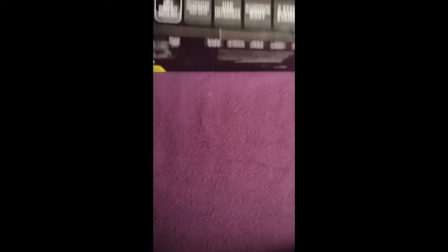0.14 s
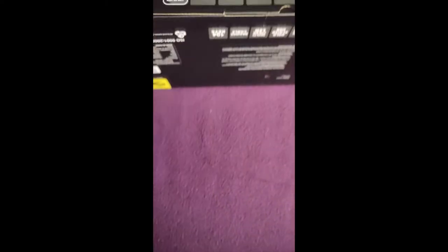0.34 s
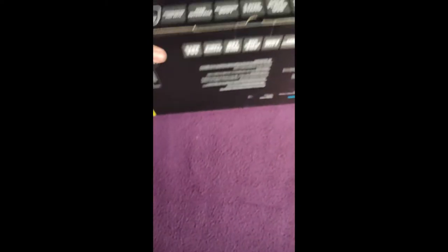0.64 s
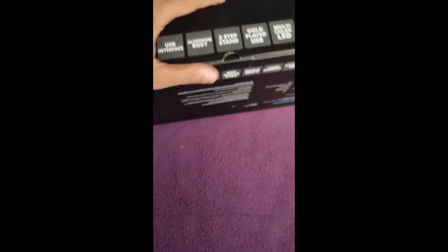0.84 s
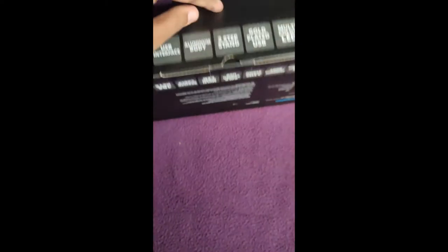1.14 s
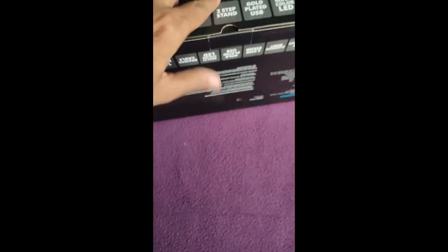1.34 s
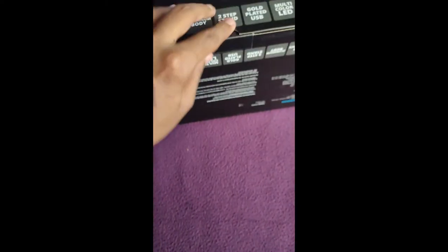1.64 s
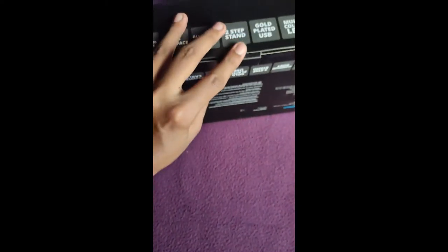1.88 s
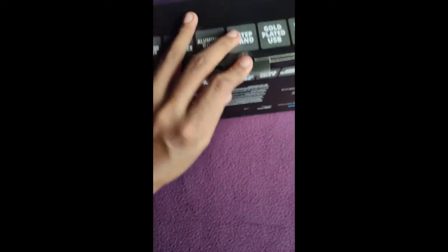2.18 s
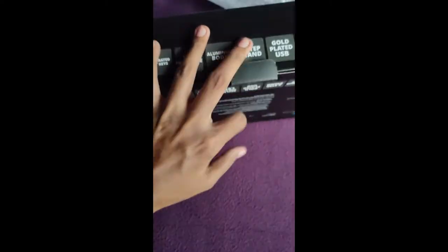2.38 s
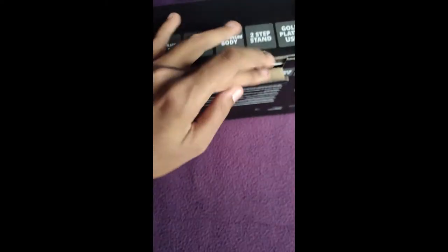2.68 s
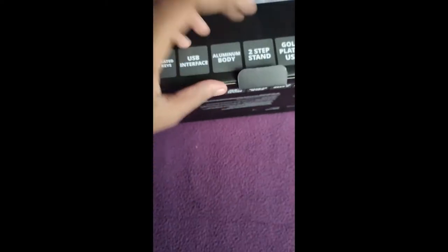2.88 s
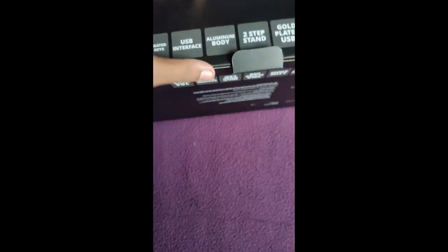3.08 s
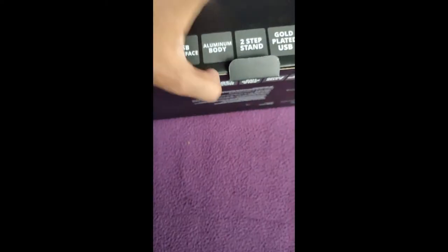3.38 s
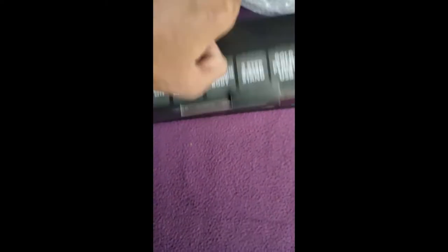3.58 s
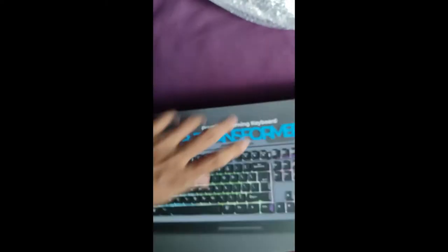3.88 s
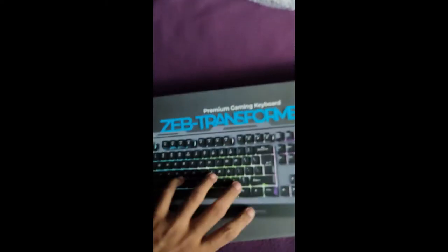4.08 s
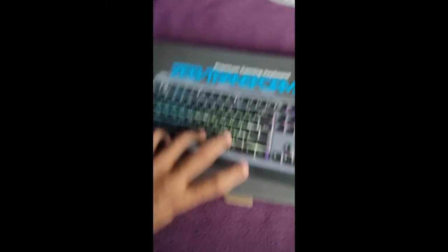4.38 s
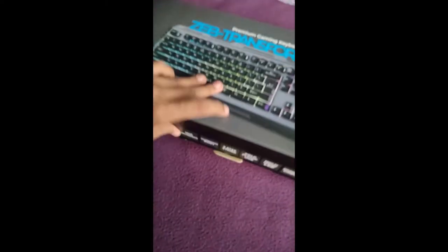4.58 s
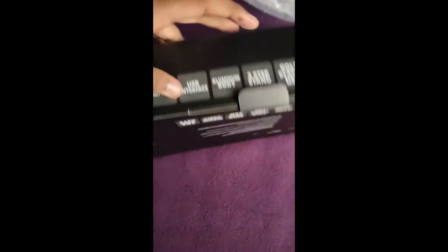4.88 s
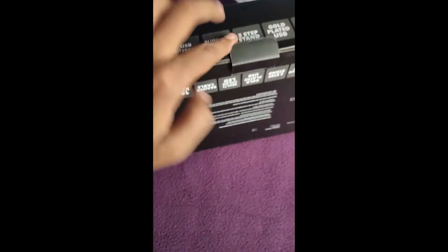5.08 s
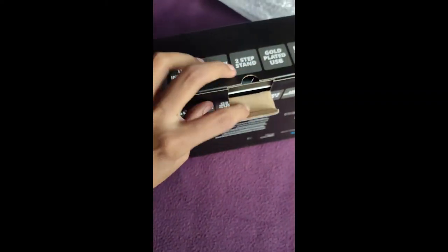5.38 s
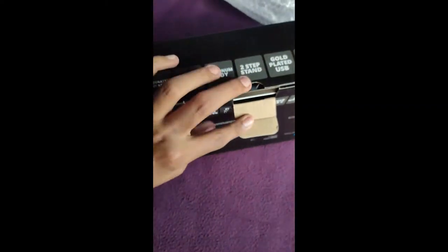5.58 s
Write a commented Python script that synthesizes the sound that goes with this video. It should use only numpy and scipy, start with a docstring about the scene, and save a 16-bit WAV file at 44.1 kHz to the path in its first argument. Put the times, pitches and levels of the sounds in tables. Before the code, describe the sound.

Close, slightly dull phone-like stereo pickup of cardboard box handling. Isolated hollow fingertip knocks, dry flap clicks and light scratchy rubs leave quiet gaps at first. Midway a louder knock and flap crack sound, later the box is flipped with heavy muffled thumps and rattling card. Squeaking fingertips and quick scrapes follow, ending on soft taps. A short small-room tail and low hush surround everything.

```python
"""Taps on a large hollow cardboard box lying on a bed: damped modes of its air, walls and panel ring.
Around them the tuck flap snaps (noise bursts and a pulse) and loose card clacks (short tuned rings);
card scrapes, skin slides and edges judder (random catches through filters), and fingertips squeak (stick-slip
tones). The box thuds on the mattress (low decaying tones); a hand rustles over a hushed small room.
Two microphone ports close by hear it, the left one later; the room adds a diffuse tail."""
import sys
import numpy as np
from scipy import signal
from scipy.fft import rfft, irfft
from scipy.io import wavfile
from scipy.ndimage import uniform_filter1d, map_coordinates

SR = 44100
rng = np.random.default_rng(int(sys.argv[2]) if len(sys.argv) > 2 else 0)


def generate_wav(signal):
    """Clip the signal to [-1, 1] and save it as 16-bit WAV at the path in sys.argv[1]."""
    frames = np.transpose(np.atleast_2d(signal))
    scaled = np.clip(frames, -1, 1) * 32767
    pcm = np.round(scaled).astype(np.int16)
    wavfile.write(sys.argv[1], SR, pcm)


N = 252693
TIME = np.arange(N) / SR

# taps on the box: (time [s], level [dB], pitch of the hollow under that grip [Hz],
# hardness [0 finger pad - 1 nail or card edge])
KNOCKS = [(0.0901, -34, 264, 0.39), (0.151, -60, 250, 0), (0.166, -50.5, 290, 0), (0.5805, -29, 283, 0.065),
          (0.966, -48, 307, 0.15), (1.164, -38, 283.6, 0.11), (1.496, -46.5, 275, 0.0097),
          (1.596, -50, 332, 0.46), (1.631, -49, 276, 0.1), (1.88, -45, 260, 0.82),
          (1.909, -33.5, 297, 0.53), (2.232, -43, 250, 0.38), (2.3606, -23, 300, 0.17),
          (2.428, -29, 304, 0.1), (2.438, -39.5, 262, 0.87), (2.873, -47, 273, 0.25),
          (2.902, -43, 265, 0.12), (2.944, -43.5, 271.5, 0.38), (3.084, -42.5, 244, 0.14),
          (3.0946, -33, 262, 0.077), (3.5727, -21, 245, 0.0095), (3.632, -23, 330, 0.21),
          (3.676, -35.5, 255, 0.015), (3.893, -41.5, 272, 0.2), (3.915, -27, 200, 0.011),
          (3.931, -31.5, 335, 0.26), (3.946, -25.5, 315, 0), (4.034, -48, 221, 0), (4.108, -32, 185, 0),
          (4.191, -36.5, 276, 0.3), (4.201, -38, 224, 0.16), (4.31, -44.5, 299, 0.17),
          (4.459, -29, 203, 0.11), (4.527, -42, 266, 0.088), (4.534, -37, 200, 0.37),
          (4.684, -43, 259, 0.34), (4.695, -37, 300, 0.12), (4.708, -26.5, 205, 0.055),
          (4.78, -31.5, 266, 0.33), (4.835, -34, 320, 0), (4.897, -37, 237, 0.17),
          (4.9378, -32.5, 255, 0.68), (5.015, -44, 370, 0.033), (5.098, -49, 366, 0.9),
          (5.203, -46, 292, 0.035), (5.248, -57, 337, 0.98), (5.354, -52.5, 282, 0.85),
          (5.38, -43, 268.4, 0.22), (5.444, -43, 225, 0.0054), (5.5, -49, 244, 0.81)]
# air and walls of the box: (multiple of the hollow pitch, relative level [dB], multiple of the hollow t60)
HOLLOW_MODES = [(0.549, -4, .8), (0.87, -8.5, 1.0), (1.007, 11, 1.0), (1.198, 3.5, 1.0), (1.552, -18.5, .6)]
# stiff card panel: (mean frequency [Hz], mean relative level [dB], t60 [s])
PANEL_MODES = [(606, 6.5, 0.02), (741, 10.5, 0.02), (870, 19.5, 0.017), (1180, 8.5, 0.0043),
               (1170, -29.5, 0.0094), (1710, -10.5, 0.002), (2220, -19.5, 0.0067), (3000, -25.5, 0.0054)]
# contact tick: (frequency [Hz], level [dB])
TICK_SPECTRUM = [(1000, -47), (2500, 7), (4600, 7), (6000, 16.5), (7600, 15), (9000, -48)]
# rasp of card fibres: (frequency [Hz], level [dB])
RASP_SPECTRUM = [(200, -22.5), (450, -8), (620, 7), (850, 1.5), (1050, -5), (1350, -6.5), (1800, -16),
                 (2400, -19), (3200, -19), (6000, -38)]
# a pad hardly clacks or ticks; both grow with hardness [dB]
PAD_CLACK_DB, HARD_CLACK_RISE_DB = -23, 24
PAD_TICK_DB, HARD_TICK_RISE_DB = -36.5, 38
HOLLOW_T60_S = 0.057  # without the palm on the lid
# while the box is turned over, the palm lies on the lid and shortens hollow ring and bounce to this share
PALM_FROM_S, PALM_UNTIL_S, PALM_SHARE = 3.58, 5.05, 0.39

# flap springing free or slapping shut: (time [s], level [dB], t60 of its chatter [s],
# level of the crack thrown at the walls [dB])
SNAPS = [(0.0902, -35.5, 0.053, -28.5), (.103, -45, 0.12, -46), (1.161, -51, 0.022, -47),
         (1.881, -70, .03, -37.5), (1.91, -35.5, 0.019, -30.5), (2.359, -36.5, 0.03, -37),
         (2.439, -33.5, 0.014, -44.5), (3.632, -40, 0.12, -36), (4.9391, -27.5, 0.0099, -25.5),
         (5.1, -57, 0.023, -58)]
# thin flap: (frequency [Hz], level [dB])
FLAP_SPECTRUM = [(250, -30.5), (470, 15), (650, 19), (950, -6), (1300, 0), (1750, -3.5), (2300, -7),
                 (2900, -16.5), (4000, -18), (7000, -21)]
# what the flap throws at the walls: (frequency [Hz], level [dB])
OUTWARD_SPECTRUM = [(300, -6.5), (1500, -6.5), (3600, 3), (6500, -8)]

# loose card clacking on the box: (time [s], level [dB], pitch of that piece [Hz])
CLACKS = [(0.58, -54.5, 1050), (.964, -65, 683), (2.704, -63, 1496), (2.707, -47.5, 680),
          (3.573, -36.5, 610), (3.632, -32.5, 628), (3.633, -46, 1057), (3.896, -41, 900),
          (3.91, -49.5, 940), (3.921, -49, 1020), (3.932, -48, 870), (3.9453, -39, 834), (4.034, -56, 840),
          (4.526, -42.5, 773), (4.695, -36, 800), (4.706, -37.5, 820), (4.939, -44, 825)]
CLACK_T60_S = .02

# card scraping over card: (peak time [s], length [s], level [dB], edge [0 flat face - 1 cut edge],
# lean: how hard it bears on the hollow [0-1])
SCRAPES = [(0.003, 0.021, -58.5, 0.45, 1), (0.132, 0.096, -53, 0.15, 0.93), (0.973, 0.043, -65, 0.79, 0),
           (1.011, 0.033, -65.5, 0.62, 0.7), (1.07, 0.041, -61, 0.6, 0.07),
           (1.157, 0.037, -61.5, 0.99, 0.26), (1.455, 0.035, -65, 0.74, 0.85),
           (2.072, 0.1, -62.5, 0.14, 0.46), (2.128, 0.09, -54.5, 0.44, 0.39), (2.221, .06, -42, 0.78, 0.3),
           (2.347, .026, -42, 0.95, 0.46), (2.358, .012, -38, 0.94, 0.1), (2.489, 0.04, -52, 0.53, 0.86),
           (2.631, 0.046, -61, 0.83, 0.4), (2.707, .022, -53.5, 0.55, 0.2), (2.817, 0.06, -62, 0.67, 0.6),
           (2.889, 0.099, -55.5, 0.5, 0.6), (2.954, 0.094, -55, 0, 0.5), (3.677, 0.035, -54.5, 0.4, 0),
           (3.909, 0.048, -47, 0.87, 0.85), (4.399, 0.069, -54.5, 0.86, 0.5),
           (4.437, .03, -45.5, 0.73, 0.7), (4.534, 0.087, -52, 0, 0.62), (4.727, 0.019, -42.5, 0.075, 0.8),
           (4.756, .085, -43, 0.82, 0.64), (4.845, 0.055, -47, 0.79, 0.4), (4.87, 0.037, -48.5, 0.51, .1),
           (4.911, 0.054, -53, 0.92, .8), (4.968, 0.078, -57, 0.84, 0.6), (5.108, 0.033, -54.5, 0.73, 0.84),
           (5.218, .1, -63.5, 0.74, 0.83), (5.372, 0.094, -53.5, 0.65, 0.66), (5.526, 0.089, -61, 0.7, 1)]
# hollow driven by friction: (frequency [Hz], level [dB])
DRONE_SPECTRUM = [(60, -16.5), (140, -9), (200, -7), (290, -2.5), (430, -7), (600, -23), (1200, -47)]
# hiss of the cut edge: (frequency [Hz], level [dB])
HISS_SPECTRUM = [(1000, -12), (2500, -8.5), (3600, 7.5), (5100, 8), (6000, 14.5), (7500, 16.5),
                 (9000, -72.5)]
SCRAPE_RISE_SHARE = 0.5  # of a scrape, spent building up
# a faster scrape is louder and catches more fibres: this rate belongs to the reference level
REF_CATCHES_PER_S, CATCH_REF_DB, DB_PER_TENFOLD_CATCHES = 620, -55, 42
FLAT_HISS_DB, EDGE_HISS_RISE_DB, LEAN_DRONE_DB = -25.5, 26, 11
# the hand moves in jerks, so a scrape comes in clumps
JERKS_PER_S, JERK_DB = 220, 2.5

# nail or card edge juddering along the flap: (start [s], length [s], level [dB], mean catch rate [1/s],
# tick against clack [dB])
JUDDERS = [(2.04, .05, -60, 90, 0), (2.108, .048, -57, 115, -2), (2.872, .045, -61, 75, -5),
           (2.937, .056, -57, 150, -18), (4.777, .065, -47, 110, -20)]
JUDDER_SCATTER, JUDDER_SCATTER_DB, JUDDER_T60_S = .25, 2.5, .005  # scatter in time as a share of the gap

# skin sliding over the glossy print: (peak time [s], length [s], level [dB])
SLIDES = [(0.11, 0.28, -65), (0.262, 0.32, -67), (0.71, 0.11, -61.5), (1.296, 0.068, -69),
          (1.382, 0.12, -62.5), (3.902, 0.05, -48), (4.28, 0.44, -66.5)]
# hiss of skin on the print: (frequency [Hz], level [dB])
SKIN_SPECTRUM = [(1000, -16), (3300, -5), (4600, -7), (6000, 6.5), (7500, 1.5), (9000, -28)]
SLIDE_RISE_SHARE = 0.26

# rubs that sing in one band, sinking as they slow: (start [s], length [s], level [dB],
# pitch at the start [Hz], pitch at the end [Hz], bandwidth [Hz])
SWISHES = [(.7, .08, -68, 7400, 6900, 900), (1.368, .052, -56, 6900, 5600, 900),
           (2.344, .022, -43, 1500, 1300, 800), (2.625, .032, -70, 4600, 4550, 260),
           (4.828, .04, -58, 4300, 3800, 1000)]
SWISH_CATCHES_PER_S, SWISH_RISE_SHARE = 2000, .45

# fingertip squeaks: (start [s], length [s], level [dB], roughness [0-1], overtones [dB per octave],
# left minus right [dB], mean slip rate at the start [Hz], midway [Hz], at the end [Hz])
SQUEAKS = [(1.06, 0.022, -58, .9, 3, 0, 703, 757, 644), (4.375, 0.049, -39, 0, 1, 3, 657, 883, 944),
           (4.408, 0.016, -38.5, 0, 0, 0, 547, 417, 408),
           (4.419, 0.0055, -38.5, 0.2, -3, 9.5, 5870, 5580, 5700),
           (4.424, 0.0084, -37.5, 0.7, -1, 9, 910, 897, 880),
           (4.427, 0.0059, -48, 0.2, -3, -6, 6050, 6100, 5880),
           (4.721, 0.014, -38, 0.9, -3, -3, 665, 635, 555),
           (4.732, 0.046, -33, 0.41, 1, -9.5, 606, 627.4, 546),
           (4.773, 0.078, -46.5, 0.8, -7, 0, 537, 624, 557), (4.856, 0.025, -44, 0.4, 1, -6, 700, 792, 870),
           (5.482, 0.049, -51.5, 0.3, -7.5, 0.5, 426.5, 401.6, 450),
           (5.516, 0.045, -50.5, 0.4, -7.5, 12, 355, 409, 470)]
# how well the wall radiates the overtones of a squeak: (frequency [Hz], level [dB])
WALL_RADIATION = [(400, 9), (850, 16.5), (1250, -9.5), (1700, -18), (2400, -16.5), (3300, -25.5),
                  (5000, -22.5)]
# a rough squeak slips unevenly, flutters in level and sheds grit (values at roughness 1)
SLIP_JITTER, FLUTTER_DB, GRIT_SHARE = .09, 4, .4

# box bumping on the bed: (time [s], level [dB], pitch of the bounce [Hz], lid against bounce [dB])
THUDS = [(0.207, -48, 50.5, -36), (0.301, -45, 54.6, -10.5), (0.583, -43.5, 58, 2.5),
         (1.209, -49.5, 53.2, -22), (1.773, -48.5, 47.6, -45.5), (2.432, -51, 57.3, 18.5),
         (3.099, -46, 61, 3.5), (3.582, -29, 45, -7.5), (3.887, -29.5, 64.7, -12.5),
         (3.913, -43, 62.2, -28), (4.104, -42, 76, -6), (5.334, -46.5, 45, -23)]
# pressed deeper into the mattress, the box bounces higher in pitch and dies sooner
REF_BOUNCE_T60_S, BOUNCE_REF_HZ, BOUNCE_DAMP_POWER = 0.5, 52.6, 1.4
LID_HZ, LID_T60_S = 124.6, 0.064

# resting hand, before the layer gains: (time [s], rustle level [dB], sway level of the box [dB])
HAND = [(0.0, -60.5, -60.5), (3.538, -63, -72), (3.83, -55.5, -54), (5.73, -60, -69.5)]

# two microphone ports: (frequency [Hz], left minus right [dB])
PORT_BALANCE = [(30, 8), (120, 6), (300, 6), (560, -2), (900, -4), (1600, -19), (2700, -1), (4700, 4.5),
                (7500, -3)]
MEAN_PORT_LAG_S, PORT_LAG_DRIFT = 0.0004306, .2  # the left port is farther from the box
# diffuse tail of the room: (frequency [Hz], t60 [s], level against the direct sound [dB])
ROOM_BANDS = [(45, 0.9, -12), (114, 0.45, -0.5), (265, 0.48, -7.5), (700, 0.4, -10.5), (1810, 0.57, -6.5),
              (4230, 0.46, -8.5), (6340, 0.39, -5.5)]
# hush of the room: (frequency [Hz], level [dB])
QUIET_SPECTRUM = [(20, -1), (48, 6.5), (80, 2), (140, 5), (200, -8), (330, -23.5), (600, -16), (1200, -25),
                  (2400, -29.5), (4600, -29), (5800, -24.5), (7600, -33)]
QUIET_DB = -62.5
TOP_HZ = 7900


def undb(db):
    """Decibel definition: amplitude gain is 10 to the power of level / 20."""
    return 10 ** (np.asarray(db) / 20)


def unit(x):
    """Normalisation by mean power: scale to rms 1."""
    return x / np.sqrt(np.mean(x ** 2))


def crest(x, size=220):
    """Normalisation by short-time power: the loudest window of size samples has rms 1."""
    power = np.mean(np.atleast_2d(x) ** 2, axis=0)
    return x / np.sqrt(uniform_filter1d(power, size, mode="constant").max())


def along(hz, points):
    """Logarithmic frequency scale: interpolate (Hz, value) points on it."""
    f, value = np.transpose(points)
    return np.interp(np.log(hz + 1e-3), np.log(f), value)


def colour(x, points, size=2048):
    """Minimum-phase filtering: the folded cepstrum gives a causal response with this (Hz, dB) spectrum."""
    cepstrum = irfft(np.log(undb(along(np.fft.rfftfreq(size, 1 / SR), points))))
    cepstrum[1:size // 2] *= 2
    cepstrum[size // 2 + 1:] = 0
    response = irfft(np.exp(rfft(cepstrum)))
    return signal.fftconvolve(np.atleast_2d(x), response[None], axes=1)[:, :x.shape[-1]]


def fade(t, t60):
    """Exponential free decay: 60 dB down after t60."""
    return np.exp(-np.log(1000) * t / t60)


def ring(t, modes):
    """Modal superposition: damped modes (Hz, dB, t60) struck at t = 0."""
    return sum(undb(db) * fade(t, t60) * np.sin(2 * np.pi * hz * t) for hz, db, t60 in modes)


def push(x, seconds):
    """Finite contact time: a force pulse peaking after these seconds spreads the blow."""
    t = TIME[:SR // 20]
    return signal.fftconvolve(x, t * np.exp(-t / seconds))[:len(x)]


def wander(rate):
    """Slow random modulation: smoothed random steps, rate per second, with spread 1."""
    hold = max(int(SR / rate), 2)
    steps = np.repeat(rng.standard_normal(N // hold + 1), hold)
    return unit(uniform_filter1d(steps, hold)[:N])


def add(track, s, sound):
    """Linear superposition: mix a sound into both channels from time s."""
    i = max(int(s * SR), 0)
    track[:, i:i + sound.shape[-1]] += sound[..., :N - i]


def spray(size, apart=0.91):
    """Partial coherence: noise from a small moving contact differs in part between the ports."""
    common, left, right = rng.standard_normal((size, 3)).T
    return unit(common + apart * np.array([left, right]))


def damping(s):
    """Added damping: the share of its free t60 that the box keeps at time s."""
    return PALM_SHARE if PALM_FROM_S < s < PALM_UNTIL_S else 1


def stroke(t, rise_share, ends_db):
    """Friction follows pressure: a stroke builds up, peaks and lets go."""
    level_db = np.interp(t / t[-1], [0, rise_share, 1], [ends_db, 0, ends_db])
    return undb(level_db) * signal.windows.tukey(len(t), .15)


def friction(t, rate, aside_db=3, spread_db=4, smooth=0.7):
    """Random impulse excitation: fibres catch and let go, rate times a second, over a smooth rub."""
    times = np.cumsum(rng.gamma(2, SR / rate / 2, 2000)).astype(int)
    signs = rng.choice([-1, 1], len(times))
    sizes = signs * undb(spread_db * rng.standard_normal(len(times)).clip(-2, 2))
    inside = times < len(t)
    catches = np.zeros(len(t))
    catches[times[inside]] = unit(sizes)[inside] * np.sqrt(SR / rate)
    # catches happen all along the edge, so each favours one port or the other
    lean_db = aside_db * rng.standard_normal(SR)[:len(t)].clip(-2, 2)
    aside = undb(lean_db * np.array([[1], [-1]]))
    return catches * unit(aside) + smooth * spray(size=SR, apart=1.5)[:, :len(t)]


def swish(rub, start_hz, end_hz, width_hz):
    """Amplitude modulation: low-passed friction on a gliding carrier makes a band that glides in pitch."""
    centre_hz = np.linspace(start_hz, end_hz, rub.shape[-1])
    carrier = np.cos(2 * np.pi * np.cumsum(centre_hz) / SR)
    low = signal.butter(2, width_hz / 2, fs=SR, output="sos")
    return unit(signal.sosfilt(low, rub) * carrier)


def knocks(swell_s=0.0021, give_s=0.0076, tick_t60=0.0087, crumple_t60=0.019, crumple=0.35,
           scatter_db=0.5, hollow_db=-1):
    """Modal excitation: a blow booms the hollow, clacks the panel and ticks at the contact point."""
    out, t = np.zeros((2, N)), TIME[:SR // 5]
    give = 1 - np.exp(-t / give_s)  # card yields a little before it stops the blow
    for s, level_db, hz, hardness in KNOCKS:
        # the grip of the hand sets pitch and damping; the enclosed air needs time to build up
        t60 = HOLLOW_T60_S * damping(s)
        modes = [(hz * k, db, t60 * share) for k, db, share in HOLLOW_MODES]
        hollow = crest(ring(t, modes) * (1 - np.exp(-t / swell_s)))
        # each spot on the panel favours other modes
        spot = rng.standard_normal((len(PANEL_MODES), 2))
        modes = [(f * (1 + .06 * shift), db + scatter_db * lift, decay)
                 for (f, db, decay), (shift, lift) in zip(PANEL_MODES, spot)]
        panel = crest(ring(t, modes))
        fibres = crest(colour(spray(len(t)) * fade(t, crumple_t60), RASP_SPECTRUM))
        clack = crest(give * (panel + crumple * fibres))
        tick = crest(colour(spray(len(t)) * give * fade(t, tick_t60), TICK_SPECTRUM))
        clack_db = PAD_CLACK_DB + HARD_CLACK_RISE_DB * np.sqrt(hardness)
        tick_db = PAD_TICK_DB + HARD_TICK_RISE_DB * hardness
        blow = undb(hollow_db) * hollow + undb(clack_db) * clack + undb(tick_db) * tick
        add(out, s, undb(level_db) * blow)
    return out


def snaps(crack_t60=0.0083, chatter_db=-12, crack_db=-3, face_db=-4):
    """Plate radiation: the flap cracks and chatters nearby; its broad face throws a pulse at the walls."""
    near, thrown, t = np.zeros((2, N)), np.zeros((2, N)), TIME[:SR // 4]
    pulse = crest(colour(signal.unit_impulse(len(t)), FLAP_SPECTRUM))
    for s, db, t60, thrown_db in SNAPS:
        blow = fade(t, crack_t60) + undb(chatter_db) * fade(t, t60)
        crack = crest(colour(spray(len(t), apart=0.94) * blow, FLAP_SPECTRUM))
        add(near, s, undb(db) * (undb(crack_db) * crack + undb(face_db) * pulse))
        add(thrown, s, undb(thrown_db) * pulse)
    return near, colour(thrown[0], OUTWARD_SPECTRUM)[0]


def clacks(fibre_db=-6):
    """Free vibration of a struck plate: loose card hits its neighbour and rings briefly at its own pitch."""
    out, t = np.zeros((2, N)), TIME[:SR // 20]
    for s, db, hz in CLACKS:
        swell = 1 - np.exp(-t * hz)  # the card gets going at the pace of its own cycle
        tone = crest(swell * ring(t, [(hz, 0, CLACK_T60_S)]))
        fibres = crest(swish(spray(len(t)), hz, hz, hz / 2) * fade(t, CLACK_T60_S) * swell)
        add(out, s, undb(db) * (tone + undb(fibre_db) * fibres))
    return out


def scrapes(ends_db=-15):
    """Friction excitation: catches of card on card drive hollow and panel, and hiss at the cut edge."""
    out, jerks = np.zeros((2, N)), undb(JERK_DB * wander(JERKS_PER_S).clip(-2, 2))
    for peak, length, db, edge, lean in SCRAPES:
        t, start = TIME[:int(length * SR)], peak - SCRAPE_RISE_SHARE * length
        rate = REF_CATCHES_PER_S * 10 ** ((db - CATCH_REF_DB) / DB_PER_TENFOLD_CATCHES)
        rub = friction(t, rate) * jerks[max(int(start * SR), 0):][:len(t)]
        drone = lean * undb(LEAN_DRONE_DB) * unit(colour(rub, DRONE_SPECTRUM))
        rasp = unit(colour(rub, RASP_SPECTRUM))
        hiss = undb(FLAT_HISS_DB + EDGE_HISS_RISE_DB * edge) * unit(colour(rub, HISS_SPECTRUM))
        add(out, start, undb(db) * stroke(t, SCRAPE_RISE_SHARE, ends_db) * (drone + rasp + hiss))
    return out


def judders(ends_db=-5):
    """Repeated impact: an edge catches and jumps in an uneven run; every jump clacks the flap and ticks."""
    out, t = np.zeros((2, N)), TIME[:SR // 40]
    for start, length, db, rate, tick_db in JUDDERS:
        gaps, sizes = rng.standard_normal((2, 12)).clip(-2, 2)
        offsets = (np.arange(len(gaps)) + JUDDER_SCATTER * gaps) / rate
        for offset, size in zip(offsets, sizes):
            jump = spray(len(t)) * fade(t, JUDDER_T60_S)
            if offset < length:
                level_db = db + JUDDER_SCATTER_DB * size + ends_db * abs(2 * offset / length - 1)
                clack, tick = (crest(colour(jump, spectrum)) for spectrum in (FLAP_SPECTRUM, TICK_SPECTRUM))
                add(out, start + offset, undb(level_db) * (clack + undb(tick_db) * tick))
    return out


def slides(catches_per_s=2200, ends_db=-15, hiss_db=-2, rasp_db=-7):
    """Dense friction noise: skin glides over the print with a fine hiss and a trace of the panel."""
    out = np.zeros((2, N))
    for peak, length, db in SLIDES:
        t = TIME[:int(length * SR)]
        rub = friction(t, catches_per_s)
        hiss = undb(hiss_db) * unit(colour(rub, SKIN_SPECTRUM))
        rasp = undb(rasp_db) * unit(colour(rub, RASP_SPECTRUM))
        pressure = stroke(t, SLIDE_RISE_SHARE, ends_db)
        add(out, peak - SLIDE_RISE_SHARE * length, undb(db) * pressure * (hiss + rasp))
    return out


def swishes(ends_db=-10):
    """Band-limited friction: an edge or a fingertip rubs so that one band sings out."""
    out = np.zeros((2, N))
    for start, length, db, *band in SWISHES:
        t = TIME[:int(length * SR)]
        pressure = stroke(t, SWISH_RISE_SHARE, ends_db)
        add(out, start, undb(db) * pressure * swish(friction(t, SWISH_CATCHES_PER_S), *band))
    return out


def squeaks(taper=0.17):
    """Stick-slip oscillation: skin on glossy print makes an unsteady gliding tone, with grit at every slip."""
    out, unsteady, flutter = np.zeros((2, N)), SLIP_JITTER * wander(600), FLUTTER_DB * wander(350)
    grit = colour(rng.standard_normal(N), FLAP_SPECTRUM)[0]
    for s, length, db, rough, overtone_db, pan_db, *slip_hz in SQUEAKS:
        on = (TIME > s) & (TIME < s + length)
        hz = np.interp((TIME[on] - s) / length, [0, .5, 1], slip_hz)
        phase = 2 * np.pi * np.cumsum(hz * (1 + rough * unsteady[on])) / SR
        partials = 0
        for k in range(1, 7):
            if k * hz.min() < TOP_HZ:
                partial_db = along(k * hz, WALL_RADIATION) + overtone_db * np.log2(k)
                partials = partials + undb(partial_db) * np.sin(k * phase)
        slip_grit = unit(grit[on] * (1 + np.cos(phase)) ** 2)
        tone = unit(partials) + GRIT_SHARE * rough * slip_grit
        tone = unit(tone * undb(rough * flutter[on])) * signal.windows.tukey(len(hz), taper)
        out[:, on] += tone * undb(db + pan_db * np.array([[.5], [-.5]]))
    return out


def thuds(contact_s=0.00068):
    """Mass on a spring: the box bounces on the mattress and its lid swings."""
    out, t = np.zeros((2, N)), TIME[:SR // 2]
    for s, db, hz, lid_db in THUDS:
        t60 = REF_BOUNCE_T60_S * (BOUNCE_REF_HZ / hz) ** BOUNCE_DAMP_POWER * damping(s)
        bounce = crest(push(ring(t, [(hz, 0, t60)]), contact_s), size=880)
        lid = crest(push(ring(t, [(LID_HZ, 0, LID_T60_S)]), contact_s), size=880)
        add(out, s, undb(db) * (bounce + undb(lid_db) * lid))
    return out


def handling(rustle_gain_db=-6.5, rasp_share_db=-12, sway_gain_db=-1, restless_db=3):
    """Continuous random excitation: the resting hand rustles faintly and sways the box at low pitch."""
    s, *columns = np.transpose(HAND)
    rustle_db, sway_db = (np.interp(TIME, s, column) for column in columns)
    skin = rng.standard_normal(N) * undb(restless_db * wander(30))
    rustle = unit(colour(skin, DRONE_SPECTRUM)) + undb(rasp_share_db) * unit(colour(skin, RASP_SPECTRUM))
    low_band = signal.butter(2, [40, 60], "band", fs=SR, output="sos")
    sway = unit(signal.sosfilt(low_band, rng.standard_normal(N)))
    return undb(rustle_db + rustle_gain_db) * rustle + undb(sway_db + sway_gain_db) * sway


def ports(x):
    """Path difference: the left port hears later, by a lag that shifts as the hands move, and in other colour."""
    balance = undb(along(np.fft.rfftfreq(2 * N, 1 / SR), PORT_BALANCE))
    gains = np.array([balance, np.ones(len(balance))]) / np.sqrt((1 + balance ** 2) / 2)
    left, right = irfft(rfft(x, 2 * N) * gains)[:, :N]
    lag_s = MEAN_PORT_LAG_S * (1 + PORT_LAG_DRIFT * wander(5))
    return np.array([map_coordinates(left, [(TIME - lag_s) * SR]), right])


def room(x, build_s=0.0043, apart_hz=900):
    """Diffuse reverberation: a small room's tail is alike at both ports in the bass, not in the treble."""
    t, hz = TIME[:SR], np.fft.rfftfreq(SR, 1 / SR)
    common, apart = rfft(rng.standard_normal((2, SR)))
    width = np.clip(hz / apart_hz, 0, 1)
    field = (common + width * apart * np.array([[1], [-1]])) / np.sqrt(1 + width ** 2)
    field = field * undb(np.outer([.5, -.5], along(hz, PORT_BALANCE) * (1 - width)))
    tail = 0
    for centre, t60, db in ROOM_BANDS:
        # overlapping bands: 1 at this centre, 0 at the others
        band = along(hz, [(row[0], float(row[0] == centre)) for row in ROOM_BANDS])
        decay = fade(t, t60) * (1 - np.exp(-(t / build_s) ** 2))
        tail = tail + undb(db) * irfft(field * band) * decay / np.linalg.norm(decay)
    return signal.fftconvolve(x[None], tail, axes=1)[:, :N]


def quiet(own_db=-1, split_hz=500):
    """Stationary noise: the ports share the bass of the room's hush, and each has its hiss to itself."""
    common, left, right = unit(colour(rng.standard_normal((3, N)), QUIET_SPECTRUM, size=8192))
    low, high = (signal.butter(2, split_hz, kind, fs=SR, output="sos") for kind in ("low", "high"))
    shared = ports(signal.sosfilt(low, common))
    return undb(QUIET_DB) * (shared + undb(own_db) * signal.sosfilt(high, [left, right]))


def scene():
    """Direct plus reverberant field: box and hand close to the ports, the room behind them."""
    box = knocks() + clacks() + scrapes() + judders() + slides() + swishes() + thuds()
    flap, thrown = snaps()
    fingertips = squeaks()
    # the flap faces the walls; the hand shields the squeaks from them
    outward = box.mean(axis=0) + thrown + undb(-11) * fingertips.mean(axis=0)
    return ports(box + flap + fingertips + handling()) + room(outward) + quiet()


def record(dry):
    """Band limitation: a steep low-pass at TOP_HZ leaves the phone's speech band."""
    return signal.sosfilt(signal.ellip(10, .2, 70, TOP_HZ, fs=SR, output="sos"), dry)


dry = scene()
out = record(dry)
generate_wav(out)
```